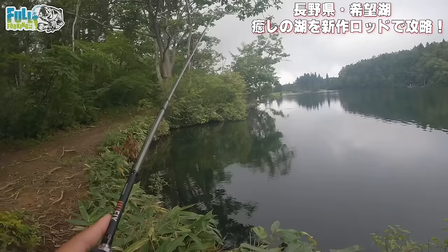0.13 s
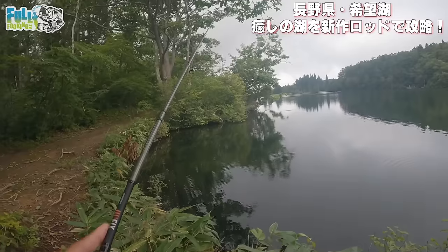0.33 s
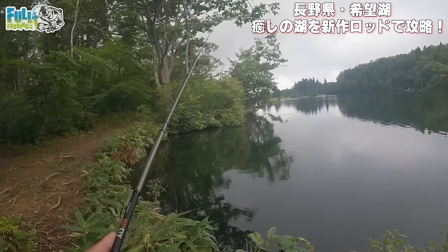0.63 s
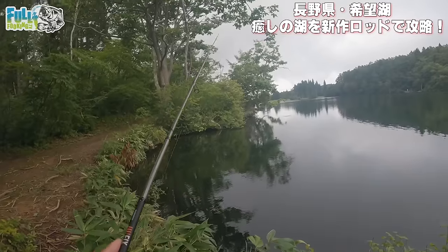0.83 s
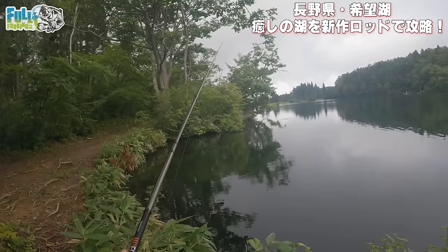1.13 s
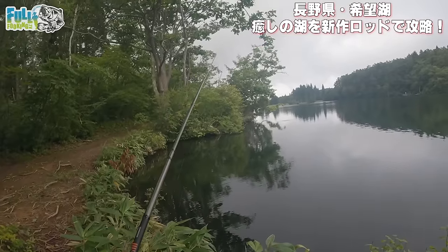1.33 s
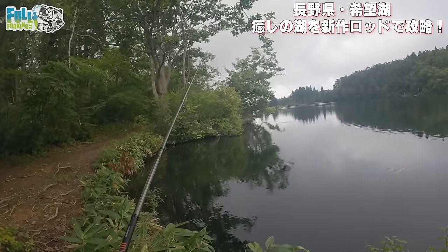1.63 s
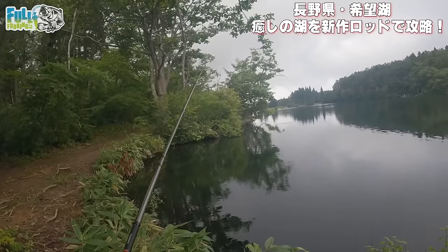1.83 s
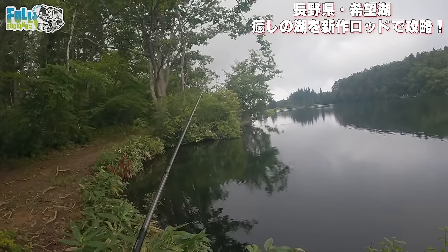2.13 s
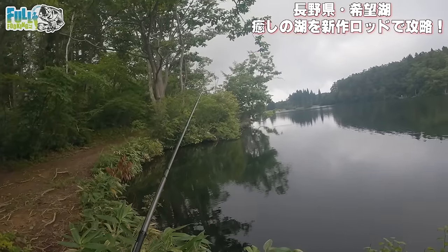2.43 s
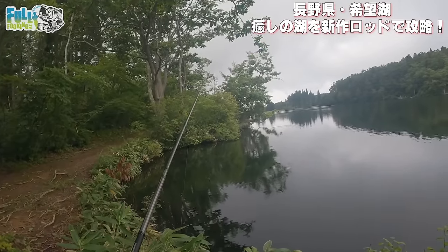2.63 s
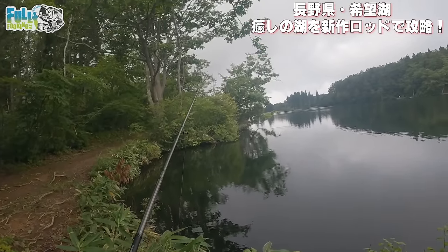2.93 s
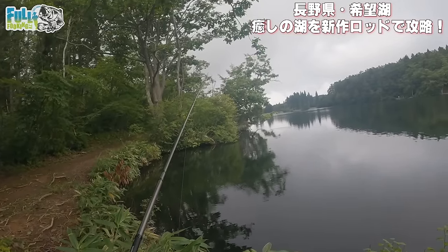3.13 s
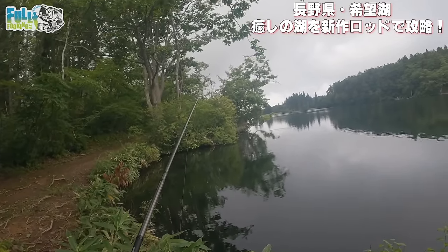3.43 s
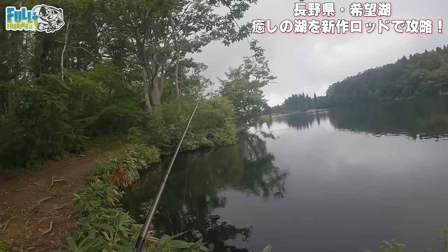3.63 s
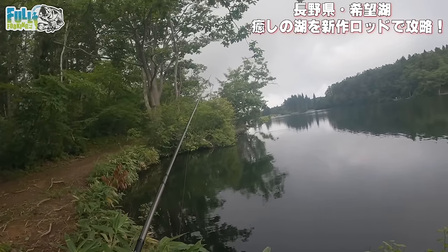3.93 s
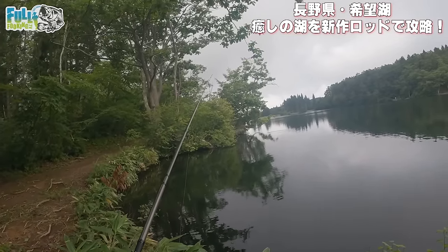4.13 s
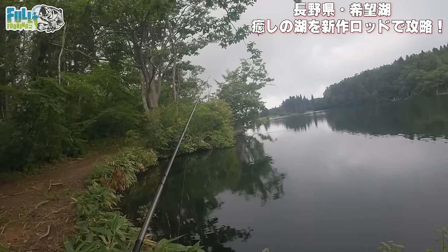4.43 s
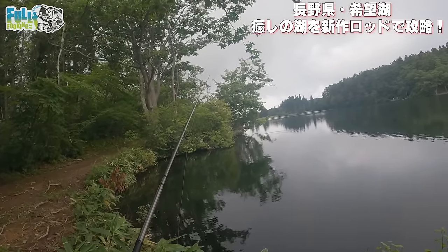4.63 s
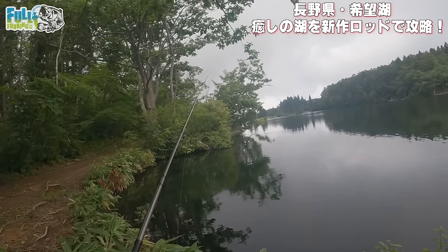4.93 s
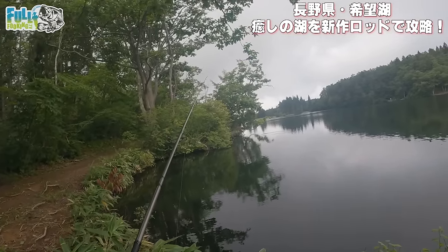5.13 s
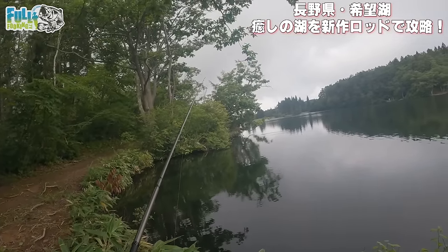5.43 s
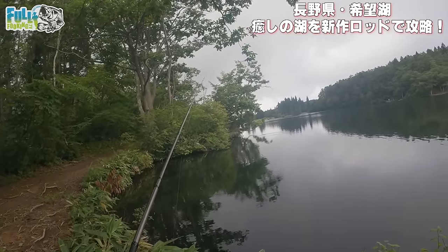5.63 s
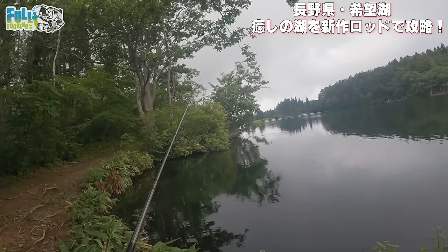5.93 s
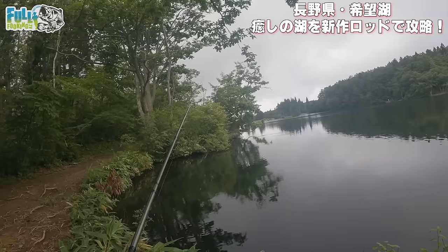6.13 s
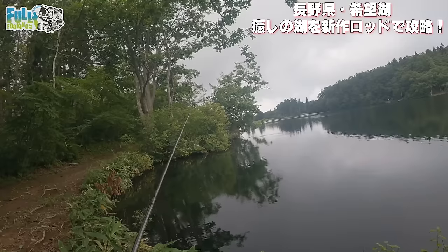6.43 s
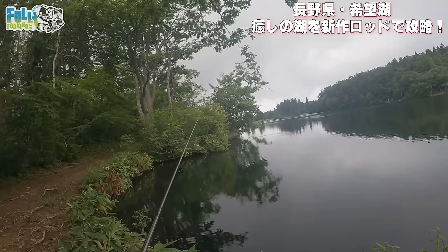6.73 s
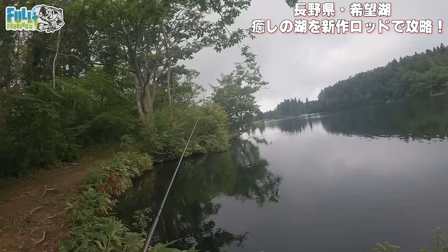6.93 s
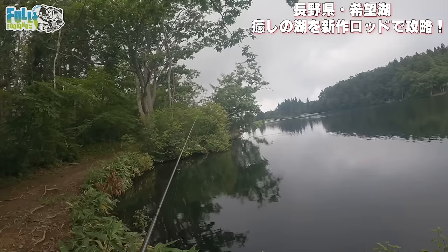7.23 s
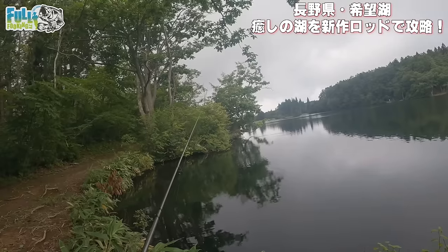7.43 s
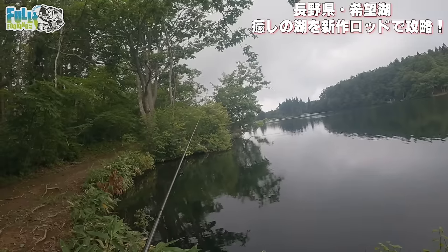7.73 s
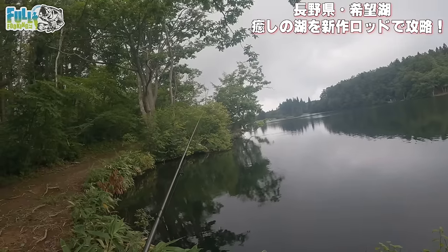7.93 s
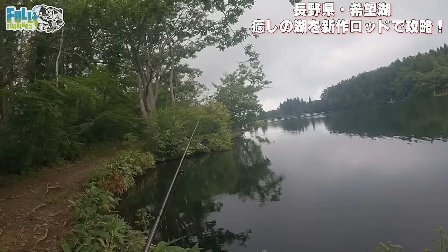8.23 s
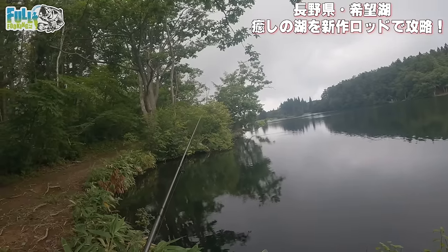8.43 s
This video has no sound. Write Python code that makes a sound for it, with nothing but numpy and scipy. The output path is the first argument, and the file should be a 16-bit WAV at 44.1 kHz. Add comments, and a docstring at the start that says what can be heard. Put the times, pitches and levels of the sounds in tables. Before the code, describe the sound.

A close cicada's rapid purr rides over a dense far chorus while faint wind rumbles, low pulses beat, and a shriller cicada rises twice.

```python
"""Cicadas in lakeside woods, heard for 8.6 s by a body-worn camera. From the start a close singer purrs in
four-click bursts, over a hissing far chorus, noise-made wind rumble, drone, soft rush and still air.
A bird whistles sine notes in the first second, and soft double thumps, made of fading sines, follow about
twice a second. Near 3.7 s come two more notes; a higher cicada, buzzing in two-click bursts, swells to its
loudest near 4.7 s, drops back, and rises again near 8 s. Both singers are clicks ringing a hollow body."""
import sys
import numpy as np
from scipy import signal
from scipy.fft import rfft, irfft, next_fast_len
from scipy.io import wavfile
from scipy.ndimage import uniform_filter1d, map_coordinates

SR = 44100
rng = np.random.default_rng(int(sys.argv[2]) if len(sys.argv) > 2 else 0)


def dump_mix(stems):
    """Bounce the given channels to the path in sys.argv[1] as a 16-bit WAV at rate SR."""
    frames = np.atleast_2d(stems).T  # one column per channel
    limited = np.clip(frames, -1, 1)  # hard clip at full scale
    pcm = np.round(limited * 32767).astype(np.int16)
    wavfile.write(sys.argv[1], SR, pcm)


N = 379260  # length in samples


def amp(db):
    """Turn decibels into a plain multiplier."""
    return 10 ** (np.asarray(db) / 20)


def unit(x):
    """Scale a sound to an rms (average strength) of 1."""
    return x / np.sqrt(np.mean(x ** 2) + 1e-20)


def along(points, hz):
    """Read a curve of (pitch_hz, value) points, with pitch on a log axis."""
    point_hz, value = np.transpose(points)
    return np.interp(np.log(hz + 1), np.log(point_hz + 1), value)


def curves(rows):
    """Join the points of each column after the time into one value per sample."""
    time_s, *columns = np.transpose(rows)
    return [np.interp(np.arange(N) / SR, time_s, column) for column in columns]


def wobble(rate):
    """A smooth random curve through `rate` random points a second."""
    points = rng.standard_normal(int(N * rate / SR) + 4)
    return map_coordinates(points, [np.arange(N) * rate / SR])


def filtered(x, response):
    """Shape a sound by multiplying its spectrum with a response, which may be complex."""
    size = next_fast_len(N + SR // 2)  # spare room lets ringing die away
    size += size % 2
    return irfft(rfft(x, size) * response(np.fft.rfftfreq(size, 1 / SR)), size)[..., :N]


def causal(spectrum):
    """Make a minimum-phase response with this spectrum: it rings only after the click."""
    def response(hz):
        cepstrum = irfft(np.log(amp(np.maximum(along(spectrum, hz), -60))))
        half = len(cepstrum) // 2
        # folding the second half onto the first moves all ringing after the click
        cepstrum[1:half] *= 2
        cepstrum[half + 1:] = 0
        return np.exp(rfft(cepstrum))
    return response


def resonances(modes, low_hz):
    """Add up ringing modes; a body this small radiates little below low_hz."""
    def response(f):
        ring = 0
        for k, (mode_hz, width_hz, level_db) in enumerate(modes):
            sign = (-1) ** k  # neighbouring modes have opposite signs
            drag = 1j * f * width_hz
            ring = ring + sign * amp(level_db) * drag / (mode_hz ** 2 - f * f + drag)
        radiation = f * f / (f * f - low_hz ** 2 - 1j * f * low_hz)
        return ring * radiation ** 3
    return response


# How alike the left and right noise are: pitch_hz, likeness (1 = identical)
LIKENESS = [(60, 0.94), (130, 0.86), (280, 0.73), (590, 0.41), (1280, 0.28), (2750, 0.57), (5900, 0.77),
            (12700, 0.28)]
# How far the noise leans to one side: pitch_hz, left_minus_right_db
SIDE_LEAN = [(60, 0), (110, -2), (200, -2.5), (360, -3.0), (650, -4.5), (1170, 0), (2130, 1.5), (3860, 1),
             (6990, 1), (12700, 8)]


def noise_layer(spectrum, patchy_db):
    """Stereo noise of rms 1, coloured by a spectrum, with patches of random gain in time and pitch."""
    grid = signal.stft(rng.standard_normal((2, N)), nperseg=512)[2]
    patches = rng.standard_normal(grid.shape[1:])
    patches = uniform_filter1d(patches, size=6, axis=0)
    patches = uniform_filter1d(patches, size=14, axis=1)
    pair = signal.istft(grid * amp(patchy_db * unit(patches)), nperseg=512)[1][:, :N]

    def middle_and_side(hz):
        # more of the side signal makes left and right less alike
        angle = np.arccos(np.clip(along(LIKENESS, hz), -1, 1)) / 2
        return amp(along(spectrum, hz)) * [np.cos(angle), np.sin(angle)]

    middle, side = filtered(pair, middle_and_side)
    stereo = np.array([middle + side, middle - side])
    return unit(filtered(stereo, lambda hz: amp(along(SIDE_LEAN, hz) * [[.5], [-.5]])))


def trees(x, t60):
    """Scattered echoes off trunks and leaves, different at each microphone port; -60 dB after t60 s."""
    t = np.arange(SR // 2) / SR
    tail = rng.standard_normal((2, len(t))) * amp(-60 * t / t60)
    return signal.fftconvolve(x[None], tail / np.linalg.norm(tail[0]), axes=1)[:, :N]


SETTLE_S = 2.1  # time constant with which an early beat closes in on its settled time


def cicada(song, early_ms, beat_hz, ribs, body, drift_ms, jitter_ms, scatter_db, pan_db, wet_db, t60):
    """Ribs of the tymbals (drum skins) buckle in a fixed order at every beat and ring the hollow abdomen."""
    beats = np.arange(1, int(N / SR * beat_hz) - 1) / beat_hz
    at = (beats * SR).astype(int)
    taps = np.arange(-8, 9)
    clicks = np.zeros(N)
    start_ms = 1000 * beats - early_ms * np.exp(-beats / SETTLE_S)
    start_ms += .03 * wobble(6)[at]  # the beat wavers, which widens every partial
    for after_ms, level_db, tilt_db in ribs:
        chance = rng.standard_normal((len(beats), 2))
        # each rib's moment creeps slowly, so the partials of the purr fade in and out
        shift_ms = drift_ms * wobble(1.2)[at] + jitter_ms * chance[:, 0]
        position = SR * (start_ms + after_ms + shift_ms) / 1000
        size = amp(level_db + scatter_db * chance[:, 1] + scatter_db * wobble(2.31)[at])
        # a short windowed sinc places each click between samples
        whole = np.floor(position).astype(int)[:, None] + taps
        gap = whole - position[:, None]
        pulse = size[:, None] * np.sinc(gap) * np.cos(np.pi * gap / 18) ** 2
        rib = np.bincount(whole.ravel(), pulse.ravel(), N)[:N]
        clicks += filtered(rib, lambda hz: amp(tilt_db * np.log2((hz + 500) / 4500)))
    voice = amp(curves(song)[0]) * unit(filtered(clicks, body))
    return voice * amp([[pan_db / 2], [-pan_db / 2]]) + amp(wet_db) * trees(voice, t60)


# Loudness of the close singer before panning and echo: time_s, level_db
NEAR_SONG = [(0, -55.5), (1.4, -55), (2.2, -52.5), (4.6, -52.5), (5.4, -53), (7, -52.5), (7.8, -51),
             (8.6, -53.5)]
# Clicks of one burst, two ribs of each tymbal in turn: after_beat_ms, level_db, treble_tilt_db_per_octave
NEAR_RIBS = [(7.95, 0, -4), (10.95, -3.5, 1), (12.35, -2.5, -2), (15.65, -5, 1)]
# Ringing modes of the abdomen: pitch_hz, width_hz, level_db
NEAR_MODES = [(2934, 58, -10.5), (3371, 135, -1), (3760, 196, 1), (4173, 172, 3), (4430, 220, 3),
              (4753, 215, 4), (5080, 370, -11.5), (5540, 700, -12.5), (7100, 1560, -22.5)]


def near_cicada():
    """The close purr: four clicks a burst; the beat starts slower and ahead of time, then settles."""
    return cicada(NEAR_SONG, early_ms=5.4, beat_hz=47.1812, ribs=NEAR_RIBS,
                  body=resonances(NEAR_MODES, low_hz=2866), drift_ms=0.057, jitter_ms=0.0069,
                  scatter_db=0.2, pan_db=4.0, wet_db=-13.5, t60=0.064)


# Loudness of the higher singer before panning and echo: time_s, level_db
HIGH_SONG = [(0, -60), (1.2, -61), (2.65, -58.5), (2.9, -62.5), (3.6, -58), (4.2, -54), (4.7, -51),
             (4.95, -51.5), (5.05, -57), (5.4, -61), (6.9, -62), (8, -57), (8.3, -60), (8.6, -63)]
# Clicks of one burst: after_beat_ms, level_db, treble_tilt_db_per_octave
HIGH_CLICKS = [(.9, 0, 0), (2.205, -7, 0)]
# Tone colour of the body: pitch_hz, relative_level_db
HIGH_COLOUR = [(4800, -40), (5300, -18), (5450, -10), (5750, -13), (6000, -2), (6150, 0), (6330, -4),
               (6550, -16), (6850, -10), (7150, -19), (7450, -29), (7800, -22), (8400, -31), (9500, -50)]


def high_cicada():
    """The higher buzz: two clicks a burst, at a steadier and faster beat."""
    return cicada(HIGH_SONG, early_ms=0, beat_hz=108.5, ribs=HIGH_CLICKS,
                  body=causal(HIGH_COLOUR), drift_ms=.015, jitter_ms=.007,
                  scatter_db=.9, pan_db=-2.6, wet_db=-11, t60=.15)


# Loudness of the far singers before wobble: time_s, level_db, shrillest_against_level_db
CHORUS_LEVEL = [(0, -51.5, -14.5), (3.6, -51, -15), (4.5, -50.5, -15), (5.9, -51, -13), (7.7, -50.5, -13.5),
                (8.6, -50, -14)]
# Tone colour of the main hiss: pitch_hz, relative_db_per_hz
CHORUS_COLOUR = [(1530, -64), (2600, -25.5), (2750, -29), (2920, -17), (3080, -34.5), (3260, -8),
                 (3910, -6), (4150, 0.5), (4800, 0.5), (5210, 0), (6070, -1.5), (7200, -15.5),
                 (9360, -40.5), (15800, -120)]
# Tone colour of the shrillest singers: pitch_hz, relative_db_per_hz
SHRILL_COLOUR = [(3880, -26.5), (6600, -0.5), (8100, -13), (8760, -19), (9970, -24), (11500, -25.5),
                 (12900, -34), (16800, -64), (22000, -120)]


def chorus():
    """Many far cicadas blur into a hiss with the colour of their bodies; the shrillest form a second layer."""
    level_db, shrill_db = curves(CHORUS_LEVEL)
    main = amp(level_db + 0.37 * wobble(4)) * noise_layer(CHORUS_COLOUR, patchy_db=.7)
    shrill = amp(level_db + shrill_db + 0.55 * wobble(6)) * noise_layer(SHRILL_COLOUR, patchy_db=1.3)
    return main + shrill


# Whistled notes, level before flutter and echo: start_s, glide_s, hold_s, from_hz, to_hz, level_db
BIRD_NOTES = [(0, .02, .09, 2230, 2200, -65), (.09, .067, .09, 1320, 2070, -62),
              (.24, .03, .04, 2850, 2950, -73), (.275, .03, .04, 1930, 2020, -66),
              (.27, .04, .03, 2230, 2230, -66), (.38, .04, .03, 2050, 2130, -72),
              (.515, .02, .03, 2400, 2220, -68), (.525, .025, .015, 2250, 1780, -66),
              (.55, .04, .015, 1650, 1170, -66), (.67, .04, .05, 2200, 2200, -75),
              (3.68, .025, .05, 2150, 2070, -70), (3.75, .05, .03, 1600, 1950, -73)]
SWELL_DB, FADE_DB_PER_S = 15, 280  # growth along the glide, fade on the held pitch


def bird():
    """Sine whistles glide to a pitch while swelling, then hold and fade; far off, so echo is strong."""
    out = np.zeros(N)
    for start_s, glide_s, hold_s, from_hz, to_hz, note_db in BIRD_NOTES:
        t = np.arange(0, glide_s + hold_s, 1 / SR)
        done = np.clip(t / glide_s, 0, 1)  # progress of the glide, 0 to 1
        level_db = note_db - SWELL_DB * (1 - done) - FADE_DB_PER_S * np.maximum(t - glide_s, 0)
        tremble = 1 + .01 * wobble(120)[:len(t)]
        pitch_hz = tremble * (from_hz + (to_hz - from_hz) * done)
        tone = np.sqrt(2) * amp(level_db) * np.sin(2 * np.pi * np.cumsum(pitch_hz) / SR)
        out[round(start_s * SR):][:len(t)] += tone * signal.windows.tukey(len(t), .1)
    out *= amp(3.2 * wobble(110))  # leaves in the path make the tone flutter
    return out * amp([[-.6], [.6]]) + amp(-2) * trees(out, t60=.5)


# First push of each pair, about two pairs a second: start_s, level_db
THUMP_TIMES = [(.365, -39.5), (.903, -40), (1.38, -37), (1.929, -42.5), (2.441, -39.5), (3.009, -40.5),
               (3.517, -40), (4.018, -40), (4.531, -38), (5.043, -38.5), (5.55, -38.5), (6.112, -38.5),
               (6.6, -41.5), (7.2, -44), (7.66, -45), (8.15, -45)]
SECOND_S, SECOND_DB = .2, -10  # delay and level of the weaker push that follows
KNOCK_DB = -6  # knock against the swing


def thumps():
    """Soft double pushes through the camera mount, perhaps the wearer's pulse: low swing, short higher knock."""
    out = np.zeros((2, N + SR))
    t = np.arange(SR // 4) / SR
    pushes = THUMP_TIMES + [(s + SECOND_S, db + SECOND_DB) for s, db in THUMP_TIMES]
    chances = rng.standard_normal((len(pushes), 2))
    for (start_s, level_db), (tune, turn) in zip(pushes, chances):
        hz = 32 * amp(1.5 * tune)
        lead = .5 * turn * np.array([[1], [-1]])  # the ports are not pushed quite in step
        swing = np.sin(2 * np.pi * hz * t + lead)
        swing = swing * amp(-60 * t / 0.4) * (1 - np.exp(-t / 0.02))
        knock = np.sin(2 * np.pi * 2.04 * hz * t + lead)
        knock = knock * amp(KNOCK_DB - 60 * t / 0.21) * (1 - np.exp(-t / 0.014))
        out[:, round(start_s * SR):][:, :len(t)] += amp(level_db) * (swing + knock)
    return out[:, :N]


# Loudness of the wind on the ports: time_s, level_db
WIND_LEVEL = [(0, -56), (.7, -60), (1.4, -51), (2.3, -57.5), (2.9, -65), (3.5, -53), (4.3, -58),
              (5.1, -53.5), (5.9, -58.5), (6.8, -56), (7.8, -57.5), (8.6, -50.5)]
# Tone colour of the wind: pitch_hz, relative_db_per_hz
WIND_COLOUR = [(7.1, -21.5), (12, 6.5), (32, 1), (46, -5), (86, -19), (108, -18), (125, -29.5), (160, -43),
               (280, -120)]


def wind_rumble():
    """Wind pushing on the microphone ports: low noise with lumpy, random loudness."""
    lumpy = amp(2.5 * wobble(5.5)) * noise_layer(WIND_COLOUR, patchy_db=1.0)
    return amp(curves(WIND_LEVEL)[0]) * unit(lumpy)


# Loudness of the drone before wobble: time_s, level_db
DRONE_LOUDNESS = [(0, -64.5), (2.5, -59.5), (3, -65), (3.6, -60.5), (5, -61.5), (5.7, -64), (7.2, -60.5),
                  (8.6, -65)]
# Tone colour of the drone: pitch_hz, relative_db_per_hz
DRONE_COLOUR = [(59, -27), (100, -13), (118, -14), (141, -1), (161, 0), (199, -1.5), (280, -15.5),
                (360, -24), (620, -120)]


def far_drone():
    """A far, low drone: a narrow band of noise that wavers in loudness."""
    return amp(curves(DRONE_LOUDNESS)[0] + 1.4 * wobble(3.5)) * noise_layer(DRONE_COLOUR, patchy_db=1.1)


# Tone colour of the soft rush: pitch_hz, relative_db_per_hz
RUSH_COLOUR = [(130, -49), (220, -15.5), (259, -5), (405, -5), (476, -11), (800, -24.5), (1040, -45),
               (1760, -120)]


def soft_rush():
    """A faint rush pitched above the drone: noise wavering around -70.5 dB."""
    return amp(-70.5 + .8 * wobble(3.5)) * noise_layer(RUSH_COLOUR, patchy_db=1.57)


# Loudness of the still air before wobble: time_s, level_db
AIR_LOUDNESS = [(0, -67), (1.8, -68), (2.6, -69.5), (8.6, -71)]
# Tone colour of the still air: pitch_hz, relative_db_per_hz
AIR_COLOUR = [(290, -32), (500, -6.5), (820, -9), (1010, -3.5), (1320, -3), (1400, -4), (1510, -5),
              (2090, -7), (2760, -8.5), (3000, -3.5), (3900, -27), (6600, -120)]


def still_air():
    """The quiet of the air: faint mid-pitched noise that slowly sinks."""
    return amp(curves(AIR_LOUDNESS)[0] + 0.44 * wobble(3.14)) * noise_layer(AIR_COLOUR, patchy_db=1.57)


def scene():
    """Add all sources, from the close singer to the background."""
    singers = near_cicada() + high_cicada() + chorus()
    background = wind_rumble() + far_drone() + soft_rush() + still_air()
    return singers + bird() + thumps() + background


def record(dry):
    """The camera keeps nothing above its band limit of 12900 Hz."""
    return filtered(dry, lambda hz: hz < 12900)


dry = scene()
out = record(dry)
dump_mix(out)
```